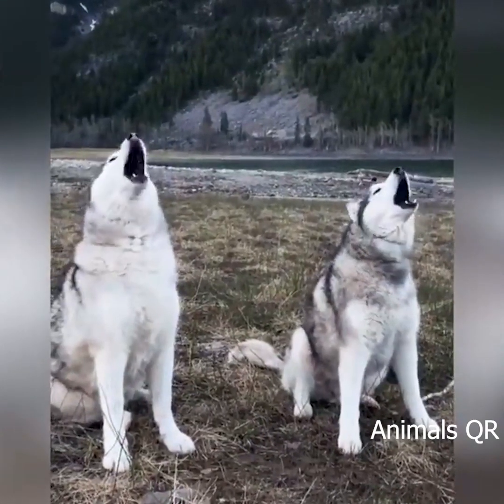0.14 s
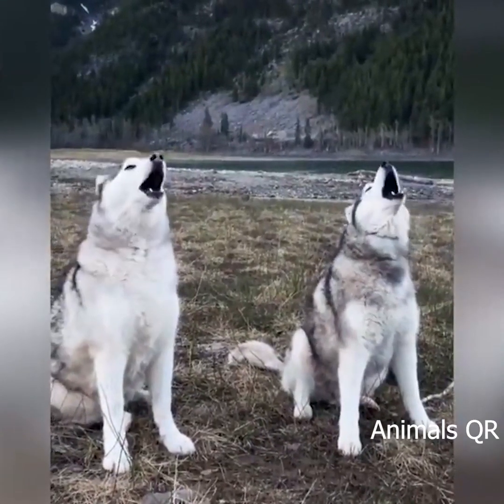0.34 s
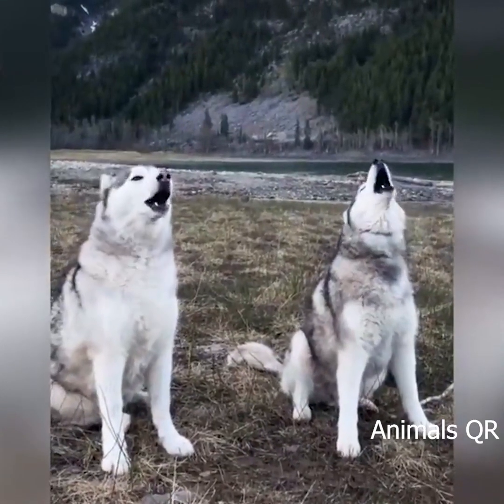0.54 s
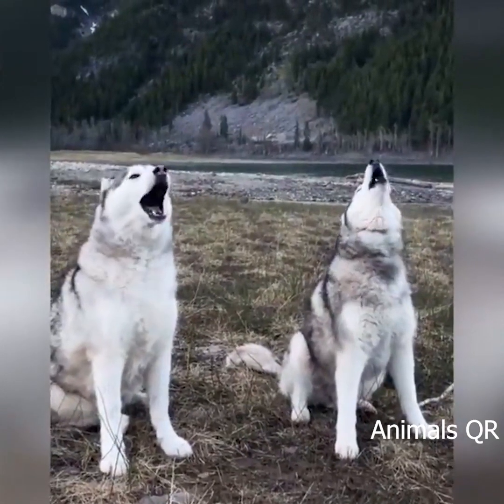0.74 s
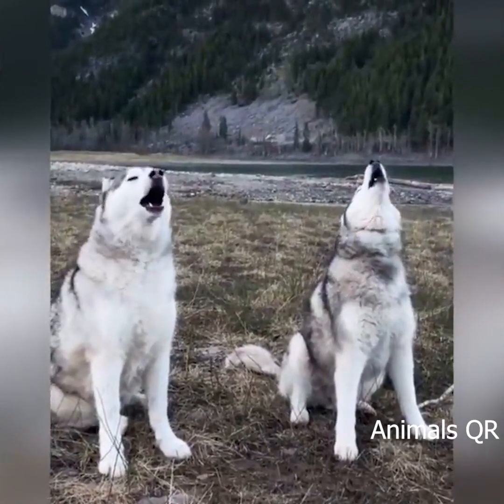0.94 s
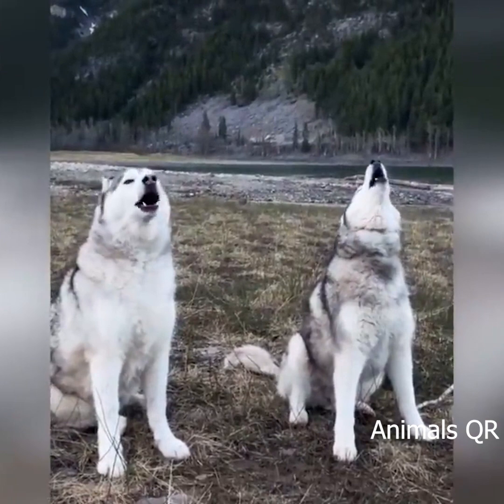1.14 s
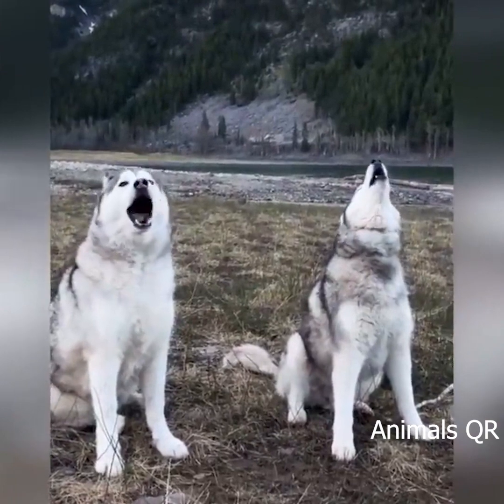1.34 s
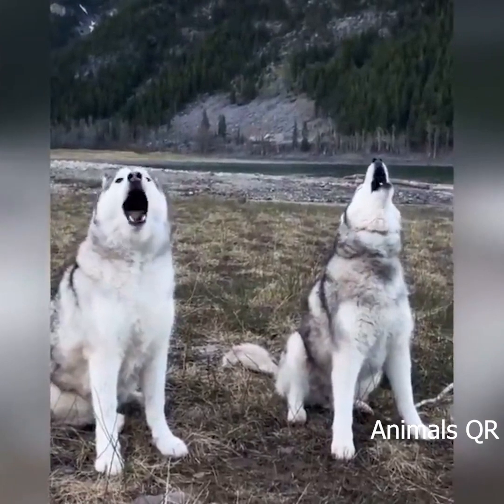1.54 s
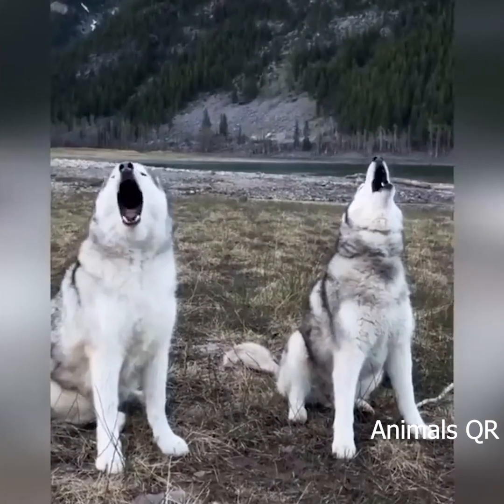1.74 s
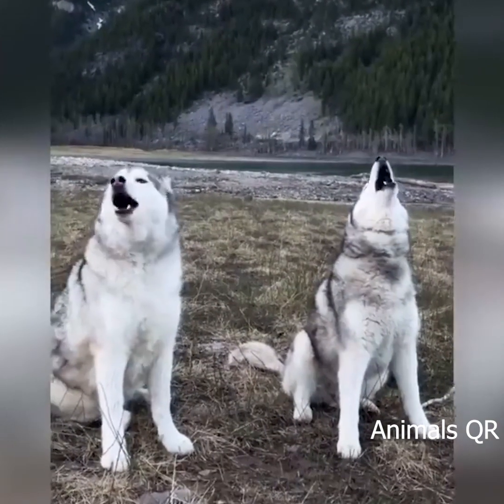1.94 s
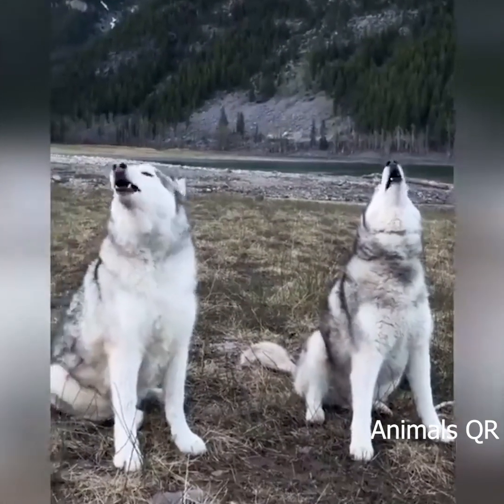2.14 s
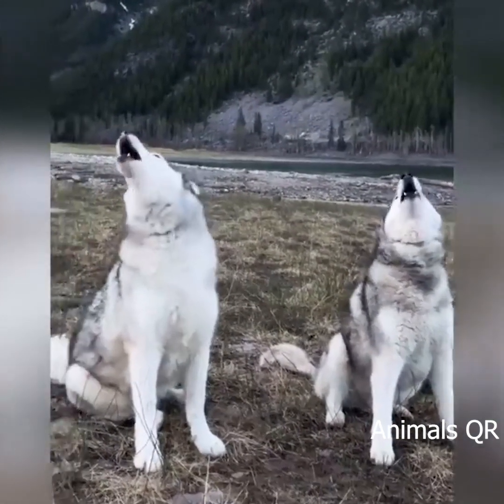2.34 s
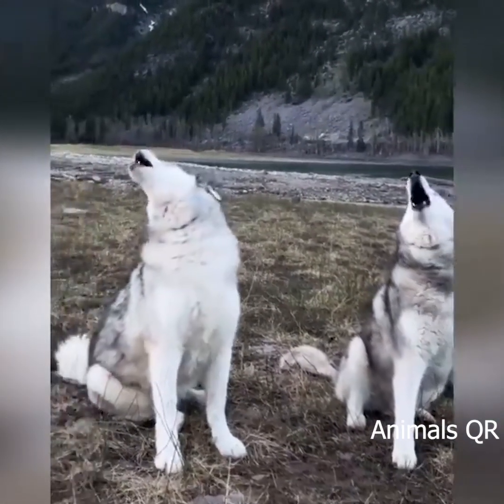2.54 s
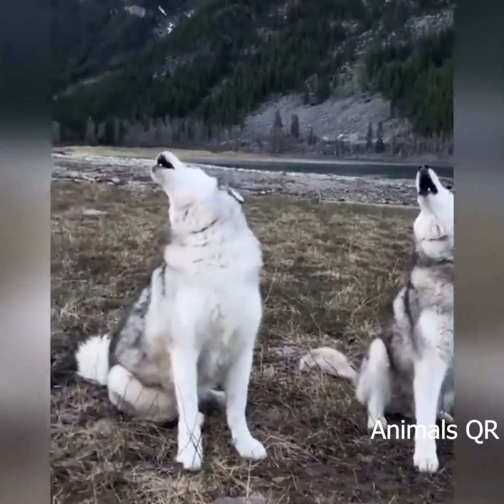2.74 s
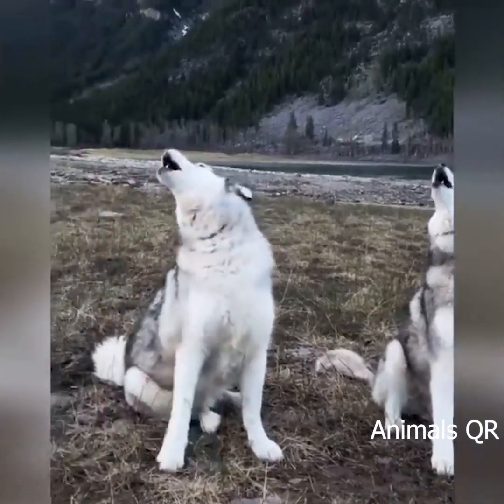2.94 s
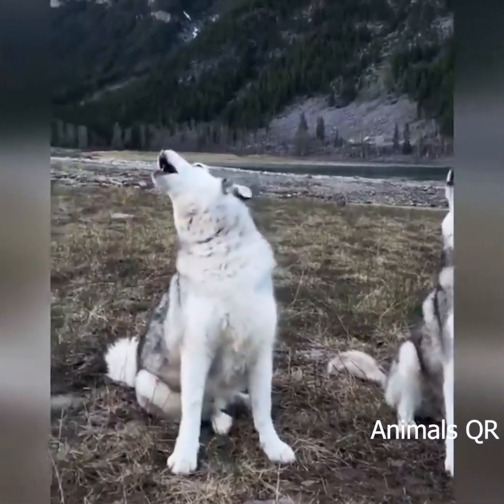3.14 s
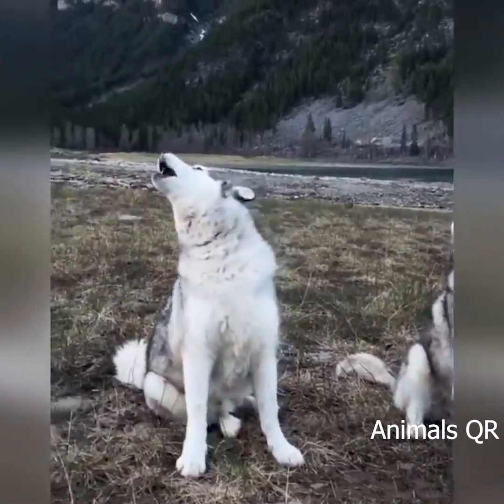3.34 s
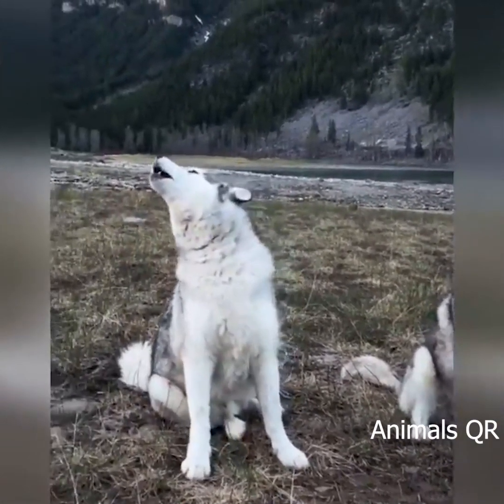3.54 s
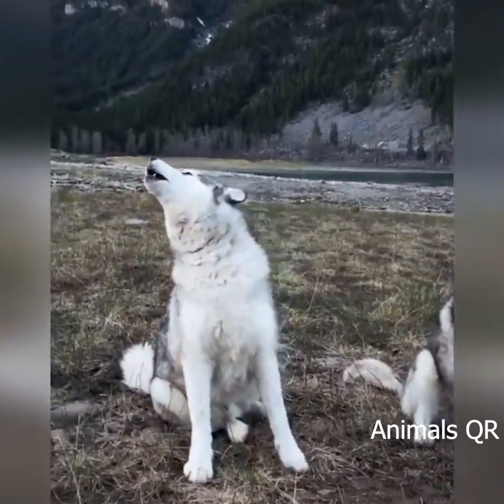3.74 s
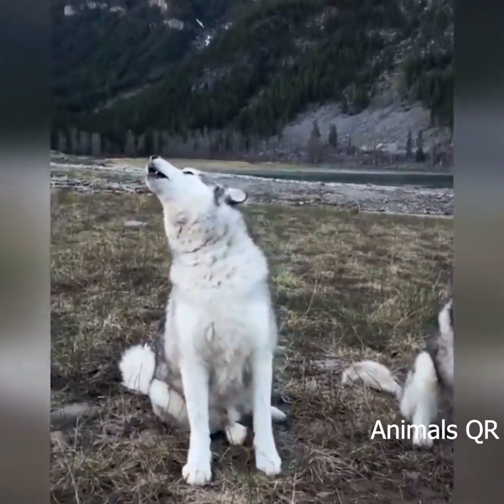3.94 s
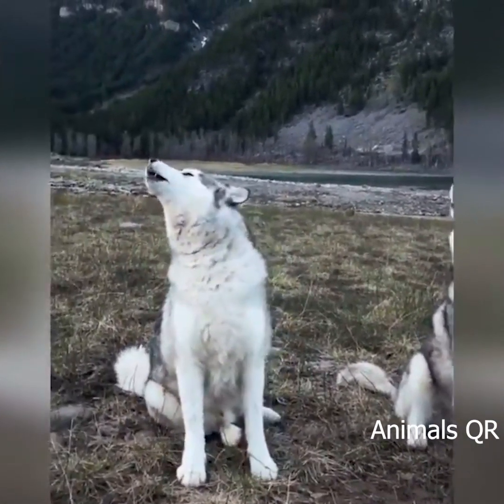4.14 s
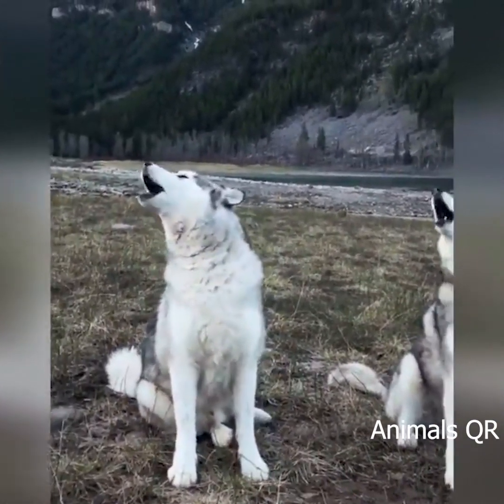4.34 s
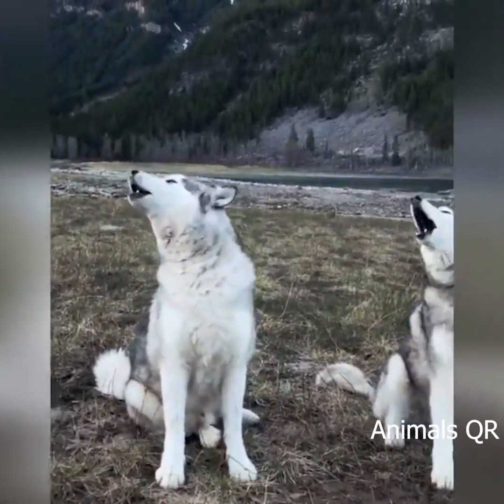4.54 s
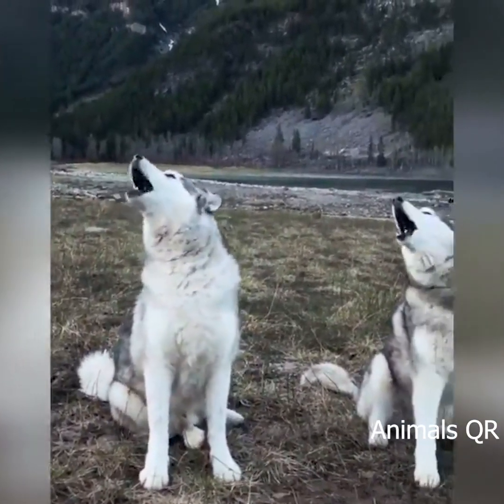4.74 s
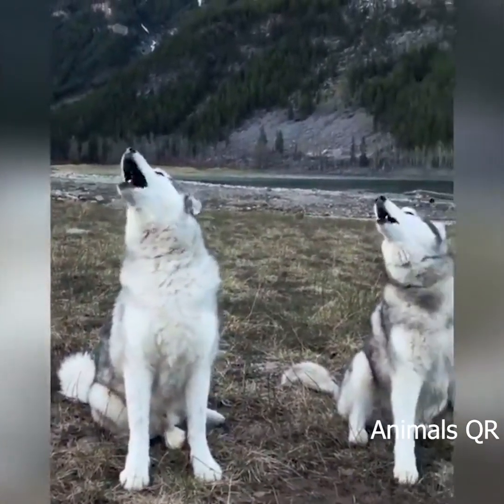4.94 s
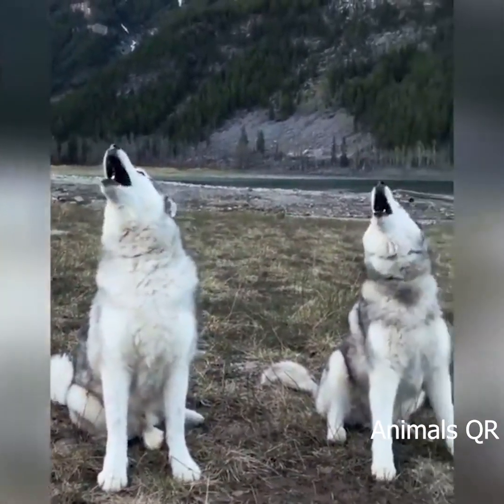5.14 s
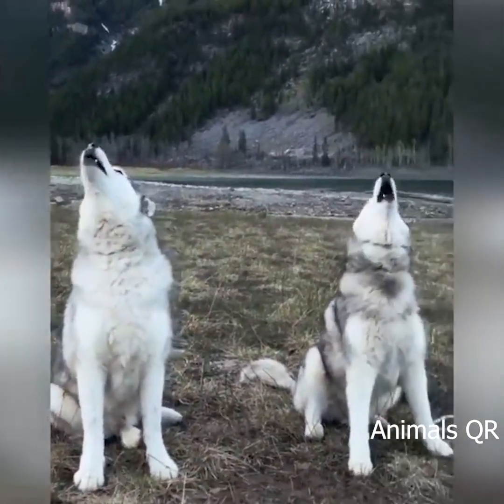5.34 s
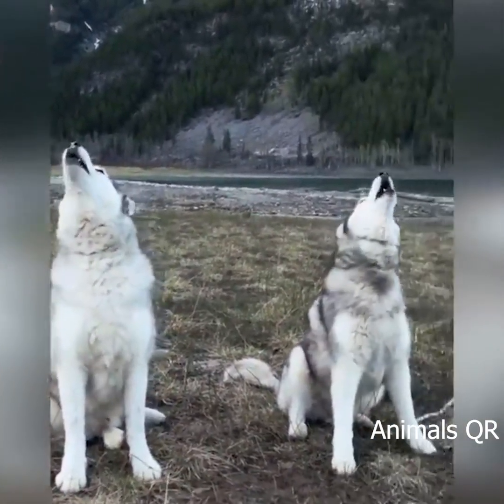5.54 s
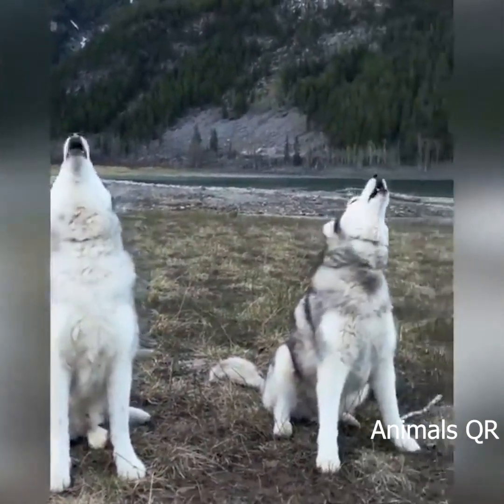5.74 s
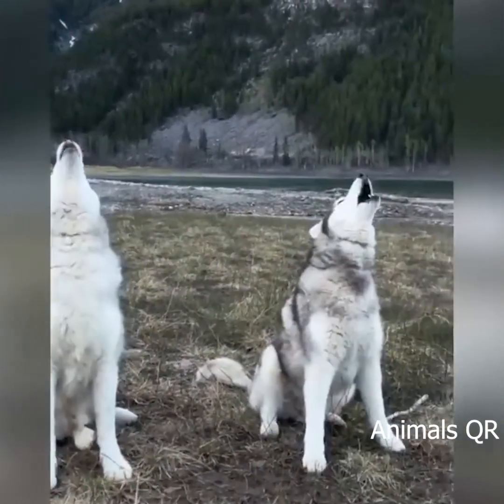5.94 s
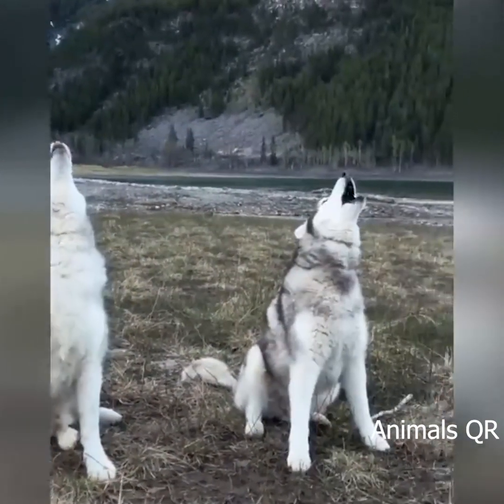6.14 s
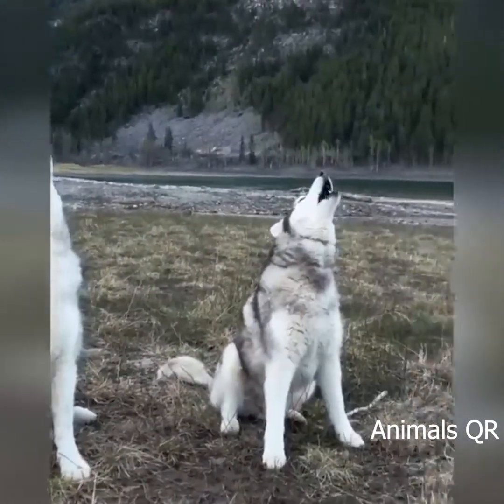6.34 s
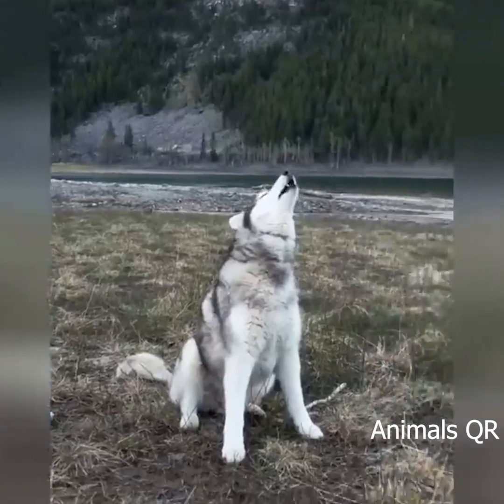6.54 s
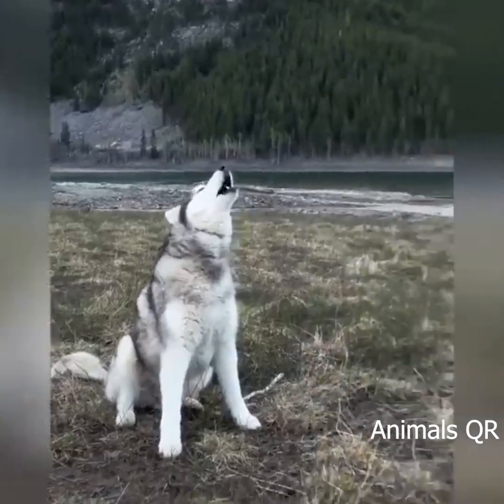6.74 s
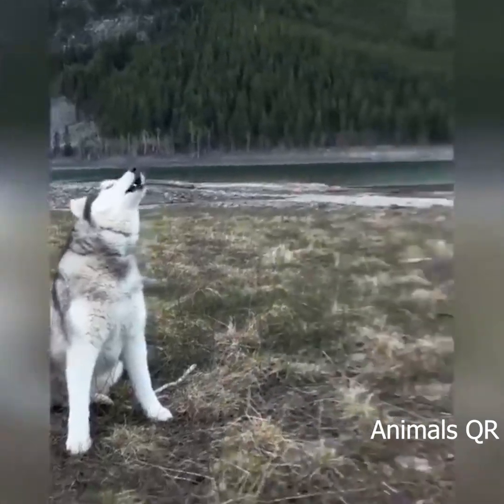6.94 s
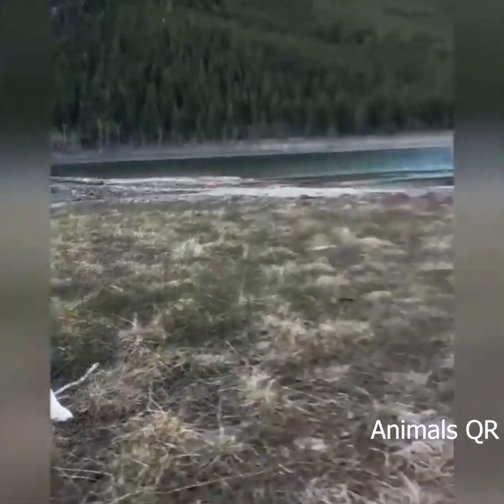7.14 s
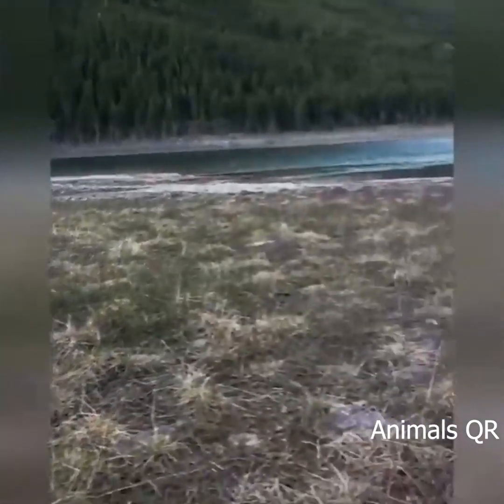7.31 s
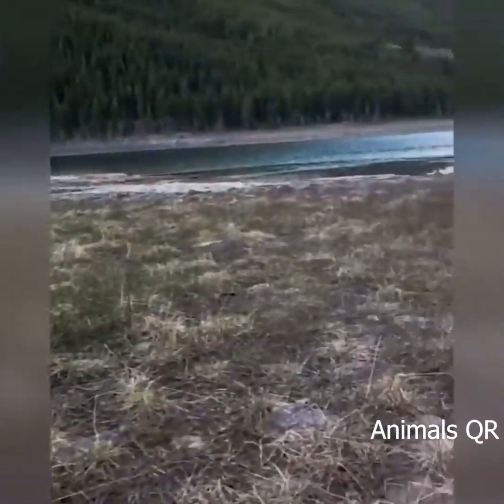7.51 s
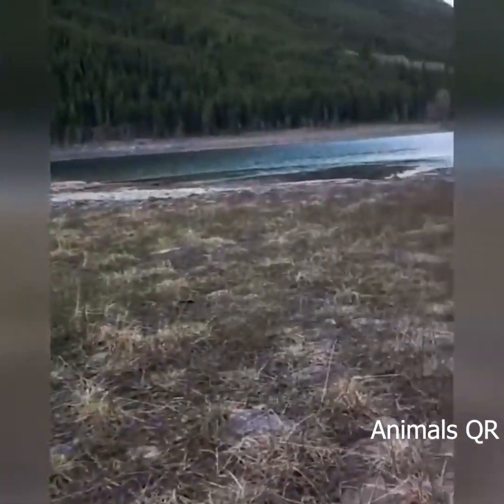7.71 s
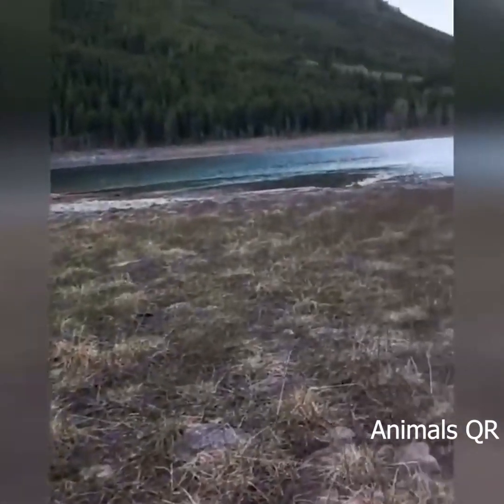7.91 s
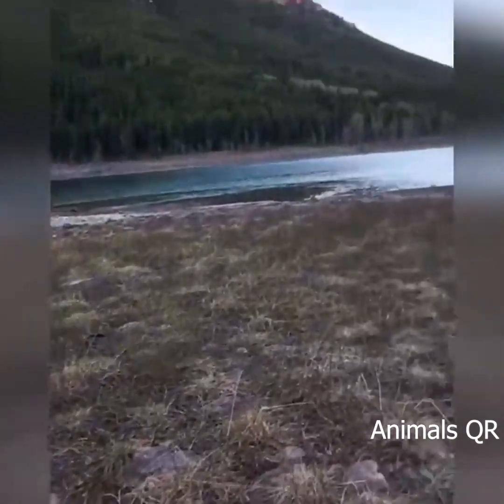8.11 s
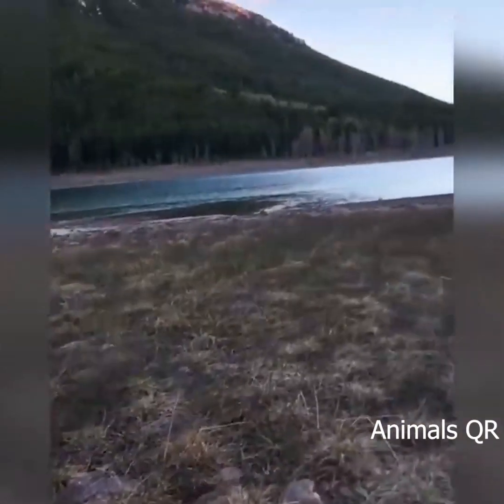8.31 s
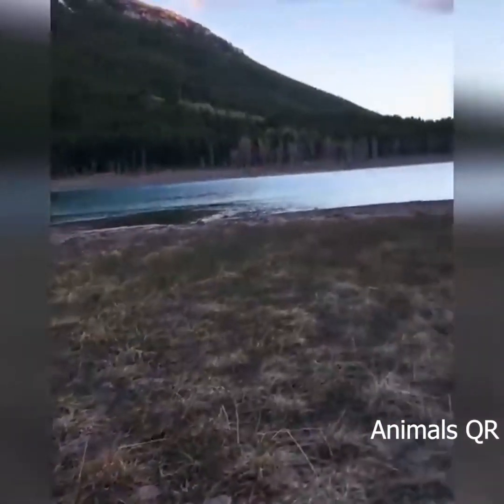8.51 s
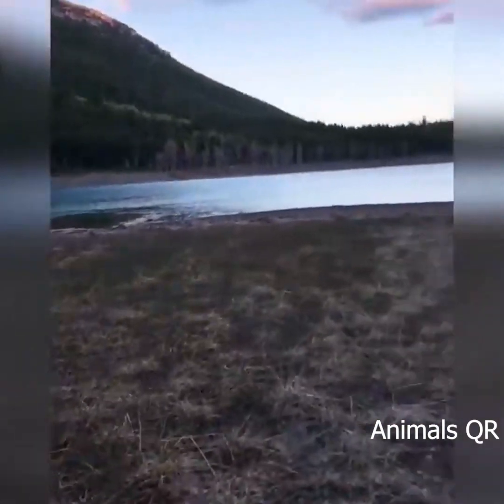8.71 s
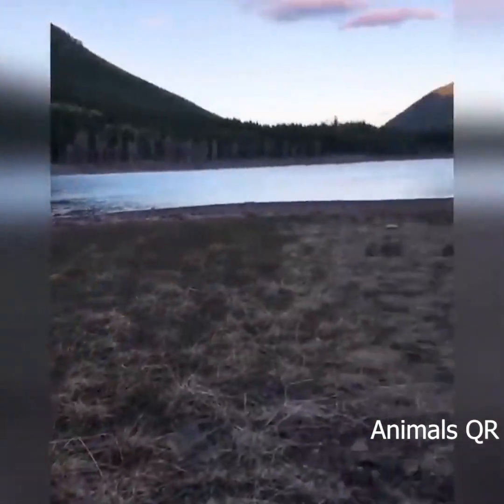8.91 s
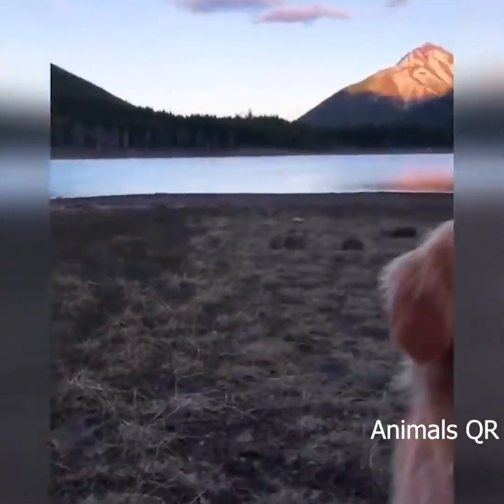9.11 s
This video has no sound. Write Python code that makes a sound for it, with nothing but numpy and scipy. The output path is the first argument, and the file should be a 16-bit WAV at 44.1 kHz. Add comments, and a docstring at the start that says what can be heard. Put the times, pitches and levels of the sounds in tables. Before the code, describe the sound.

Two large dogs howl close by in an open meadow with light wind buffeting the microphone. The higher dog begins hoarse and pulsing, then sings long, nearly pure falling glides; the lower one holds a reedy, wavering note beneath. After about seven seconds the howls fade into a grumble, broken cries, a small hoot and yelps, with one last hoarse yelp near the end.

```python
"""Two huskies howling on a meadow

An open lakeside meadow with light wind on the microphone, a phone a couple of metres from the dogs.
The high dog sings nearly pure glides from a few sines; in its breaks thirds of the pitch and rasping
noise make a hoarse yowl, and it ends in a yelp, a faint whine and a last yelp. The low dog holds a reedier
note of harmonics through a fixed throat colour. Wind and hush are coloured noise; the ground scatters a weak tail."""
import sys
import numpy as np
from scipy import signal
from scipy.fft import rfft, irfft, next_fast_len
from scipy.io import wavfile
from scipy.ndimage import uniform_filter1d, minimum_filter1d

SR = 44100
rng = np.random.default_rng(int(sys.argv[2]) if len(sys.argv) > 2 else 0)


def inscribe(sig):
    """Save sig as 16-bit PCM at rate SR to the path in sys.argv[1].

    A 1-D sig is mono; a 2-D sig holds one channel per row.
    Samples are clipped to [-1, 1] before scaling.
    """
    pcm = np.round(np.clip(np.atleast_2d(sig).T, -1, 1) * 32767)
    wavfile.write(sys.argv[1], SR, pcm.astype(np.int16))


N = 404397
TIME = np.arange(N) / SR  # s
CONTROL_STEP = 50  # samples between values of the slowly changing gains
CONTROL_TIME = TIME[::CONTROL_STEP]  # s
TOP_HZ = 15700  # upper edge of what the microphone hears


def undb(db):
    """Decibels to gain."""
    return 10 ** (np.asarray(db) / 20)


def curves(rows):
    """The columns of a table, joined by straight lines in time."""
    s, *columns = np.transpose(rows)
    return [np.interp(TIME, s, c) for c in columns]


def colour_db(points, hz):
    """A spectrum in dB, read on a log-frequency axis."""
    f, db = np.transpose(points)
    return np.interp(np.log(hz), np.log(f), db)


def noise(points):
    """Noise of the given colour, spread 1."""
    size = next_fast_len(N)
    hz = np.arange(size // 2 + 1) * SR / size + 1  # the 1 keeps the logarithm finite
    spectrum = rfft(rng.standard_normal(size)) * undb(colour_db(points, hz))
    x = irfft(spectrum, size)[:N]
    return x / x.std()


def flutter(hz):
    """Random wobble up to about hz, spread 1."""
    lowpass = signal.butter(2, hz, fs=SR, output="sos")
    x = signal.sosfilt(lowpass, rng.standard_normal(N))
    return x / x.std()


def drift(rate, count):
    """Smooth random control values changing about rate times a second, spread 1, a row per partial."""
    settle = 400  # control values dropped while the filter starts up
    lowpass = signal.butter(2, min(rate / 441, .9), output="sos")  # 441 Hz: half the control rate
    draws = rng.standard_normal((count, len(CONTROL_TIME) + settle))
    x = signal.sosfilt(lowpass, draws)[:, settle:]
    return x / x.std()


def gate(start, end, edge):
    """1 between two moments, with soft edges; all in seconds."""
    return np.clip(np.minimum(TIME - start, end - TIME) / edge + .5, 0, 1)


def blend(clear, broken, share):
    """Cross-fade at constant power; share is the broken part's power, 0-1."""
    return np.sqrt(1 - share) * clear + np.sqrt(share) * broken


def turn(hz):
    """Phase of an oscillator, in radians."""
    return 2 * np.pi * np.cumsum(hz) / SR


def song(calls):
    """A dog's calls joined: when it sounds, its smoothly gliding pitch, its effort."""
    sounding = sum(gate(call[0][0], call[-1][0], 0.024) for call in calls)
    rows = sorted(tuple(row) for call in calls for row in call)
    hz, effort_db = curves(rows)
    return np.minimum(sounding, 1), uniform_filter1d(hz, size=700), effort_db


def overtones(phase, hz, throat, orders, uneven_db, rate):
    """Harmonics slide through a fixed throat colour, each swelling and fading by itself; rms about 1."""
    out, power = 0, 0
    phase = (phase % (2 * np.pi)).astype(np.float32)
    control_hz = hz[::CONTROL_STEP]
    for k, swell in zip(orders, drift(rate, len(orders))):
        partial_hz = k * control_hz
        gain = undb(colour_db(throat, partial_hz) + uneven_db * swell) * (partial_hz < TOP_HZ)
        partial = np.sin(k * phase + k * k)  # k * k scatters the starting phases
        out = out + np.interp(TIME, CONTROL_TIME, gain) * partial
        power = power + gain ** 2 / 2
    rms = np.sqrt(uniform_filter1d(power, size=20))
    return out / np.interp(TIME, CONTROL_TIME, rms)


def rasp(phase, throat):
    """Turbulence puffed out once a cycle through the throat."""
    low_cut = [(300, -46), (800, -20.5)]  # (frequency [Hz], level [dB])
    return noise(low_cut + list(throat)) * (1 + 0.78 * np.cos(phase))


# wind buffeting the microphone, before the gusts: (time [s], level [dB])
WIND_LEVEL = [(0, -43.5), (1.1, -47.5), (1.6, -63), (2.6, -48.5), (3.2, -58.5), (4.8, -40), (5.6, -47),
              (6.9, -38.5), (7.1, -61)]
# spectra of the wind and of the faint air hush: (frequency [Hz], relative level [dB])
WIND_COLOUR = [(20, -18.5), (70, 5), (130, -3.5), (240, -16), (1200, -56)]
AIR_COLOUR = [(30, -16.5), (170, -2.5), (450, 0), (1500, -13), (5000, -25), (15000, -34.5)]
AIR_DB = -49.5  # average level of the hush


def outdoors():
    """Buffeting wind over the faint hush of the valley: two coloured noises with wandering levels."""
    gusts_db = 3.5 * flutter(9)
    wind = noise(WIND_COLOUR) * undb(curves(WIND_LEVEL)[0] + gusts_db)
    hush = noise(AIR_COLOUR) * undb(AIR_DB + flutter(2.5))
    return wind + hush


def meadow(x):
    """Open ground: only a weak, dull scatter comes back, decaying 60 dB in a quarter of a second."""
    t = TIME[:SR]
    tail = rng.standard_normal(SR) * undb(-60 * t / 0.25) * (t > .006)
    tail = signal.sosfilt(signal.butter(1, 3000, fs=SR, output="sos"), tail)
    tail = tail / np.linalg.norm(tail)
    return x + undb(-19.0) * signal.fftconvolve(x, tail)[:N]


# a faint low tone under the end of the last howl: (time [s], level [dB])
WAVER_LEVEL = [(6.761, -40.5), (7.1, -40.5), (7.421, -34), (7.501, -32)]


def wavering_tone(centre_hz=320, swing_hz=62):
    """A soft low sine whose pitch swings up and down six times a second."""
    hz = centre_hz + swing_hz * np.cos(2 * np.pi * 6 * TIME)
    sounding = gate(WAVER_LEVEL[0][0], WAVER_LEVEL[-1][0], .03)
    return sounding * undb(curves(WAVER_LEVEL)[0]) * np.sin(turn(hz))


# how bright the dogs' treble is, brightest in the closing calls: (time [s], treble lift [dB])
TREBLE_LIFT = [(0, -3), (.6, 0), (1.3, 4), (2.9, 4), (3.7, 12.5), (4.6, -4.5), (5, -2.5), (5.4, 6.5),
               (6.3, 1.5), (7.1, -2.5), (7.3, 3.5), (7.55, 8.5), (7.76, 8), (7.95, 19), (8.5, 5),
               (9.1, 10.5)]


def treble_lift_db():
    """The slow brightening and dulling shared by the dogs' treble and the low dog's hiss."""
    return curves(TREBLE_LIFT)[0]


def lifted_treble(dogs):
    """A treble band of the voices with a slowly changing lift and a slight random flutter."""
    band = signal.butter(2, [3100, 7000], "band", fs=SR, output="sos")
    treble = signal.sosfiltfilt(band, dogs)
    lift_db = treble_lift_db() + 2 * flutter(14)
    return dogs + (undb(lift_db) - 1) * treble


# mouth resonances that swell a low harmonic gliding through them: (frequency [Hz], level [dB])
LOW_MOUTH = [(590, -3), (720, -1), (800, -5), (950, -12), (1030, -3), (1130, -2.5), (1200, -7),
             (1300, -6.5), (1420, -13), (2000, -14)]
# how far the low dog's jaw opens: (time [s], lift of the overtones [dB])
LOW_JAW = [(0, 6), (1.3, 8.5), (1.8, 7.5), (2, 1), (2.7, 1), (3.4, -9.5), (3.9, -17.5), (4.15, 1),
           (4.7, 11), (5.3, -1), (5.6, -5.5), (6.35, 0.5), (6.6, 0), (7.3, 10.5), (7.72, 13.5), (7.8, 12.5),
           (7.84, 1), (7.95, -17)]
LOW_OVERTONES_DB = -20.5  # overtones against effort, before the jaw's lift


def low_levels(hz, effort_db, wander_db=3.5):
    """Levels in dB of harmonics 2 to 4, each wandering in the mouth's resonances, and of the overtones."""
    harmonic_db = []
    for k in range(2, 5):
        harmonic_db.append(effort_db + colour_db(LOW_MOUTH, k * hz) + wander_db * flutter(6))
    return harmonic_db, effort_db + LOW_OVERTONES_DB + curves(LOW_JAW)[0]


# the low dog's calls: (time [s], pitch [Hz], effort [dB])
LOW_OPENING = [(0, 338.7, -17), (.2, 360, -18.5), (.57, 339.6, -20), (1.14, 319, -25), (1.41, 326.5, -23.5),
               (1.71, 368, -17.5), (1.95, 376, -19), (2.07, 389.3, -25), (2.11, 486, -43.5)]
LOW_LONG_HOWL = [(2.569, 307.3, -20), (2.719, 341.1, -19.5), (3.22, 341.6, -22), (3.42, 323.6, -25.5),
                 (3.57, 307.6, -27.5), (3.98, 297.8, -29), (4.04, 326.2, -17.5), (4.2, 341.6, -22),
                 (4.5, 363.3, -16.5), (4.86, 379.2, -18), (5, 361.9, -27), (5.26, 339.4, -18.5),
                 (5.6, 319, -21), (5.811, 294, -20.5), (5.88, 316.7, -24), (6.1, 343.9, -17.5),
                 (6.36, 355.5, -17), (6.6, 298.3, -27.5), (6.88, 317, -31), (7.099, 311.5, -51)]
LOW_GRUMBLE = [(7.2, 295.3, -35), (7.3, 318.2, -21), (7.37, 354, -26.5), (7.409, 298.6, -29),
               (7.469, 282, -19.5)]
LOW_RISING_CALL = [(7.69, 331, -28.5), (7.735, 380, -17.5), (7.775, 401, -13.5), (7.799, 392, -17.5),
                   (7.841, 447.6, -19), (7.892, 487.4, -20.5)]
LOW_WHIMPER = [(8.058, 501, -30), (8.089, 461.6, -30), (8.131, 537, -32)]
# throat and mouth colour of its overtones: (frequency [Hz], relative level [dB])
LOW_THROAT = [(1400, 0), (2200, -8), (2800, -3), (3700, -36), (4400, -30), (5700, -23), (7100, -25.5),
              (11500, -42.5), (15000, -48.5)]
# where it turns hoarse: (start [s], end [s], roughness [0-1])
LOW_HOARSE = [(7.221, 7.459, 0.28), (7.687, 7.841, 0.08)]


def low_dog():
    """A steady reedy note whose weak fundamental lies below the mouth's resonances, with a little hiss."""
    calls = [LOW_OPENING, LOW_LONG_HOWL, LOW_GRUMBLE, LOW_RISING_CALL, LOW_WHIMPER]
    sounding, hz, effort_db = song(calls)
    harmonic_db, upper_db = low_levels(hz, effort_db)
    phase = turn(hz * (1 + 0.003 * flutter(40) + 0.0017 * flutter(220)))
    body = sum(undb(db) * np.sin(k * phase) for k, db in enumerate(harmonic_db, 2))
    fundamental = undb(harmonic_db[0] - 27.5) * np.sin(phase)
    # slightly uneven cycles blur the highest harmonics most
    uneven_phase = phase + .014 * flutter(110)
    upper = overtones(uneven_phase, hz, LOW_THROAT, range(5, 42), uneven_db=5, rate=3)
    hoarse = np.clip(sum(r * gate(a, b, .03) for a, b, r in LOW_HOARSE), 0, 1)
    upper = blend(upper, rasp(phase, LOW_THROAT), hoarse)
    hiss = noise([(2500, -30), (4600, 0), (6000, -2), (14000, -24)])
    upper = upper + hiss * undb(-36 + treble_lift_db())
    voice = np.sqrt(2) * (body + fundamental) + undb(upper_db) * upper
    return sounding * voice * undb(.5 * flutter(55))


# sudden pushes of the high dog's chest:
# (time [s], extra effort [dB], pitch lift [Hz], fundamental regained [dB])
PUSHES = [(-.02, 23, -10.5, -4.5), (0.199, 5.5, 5, 8), (.44, 2.5, 8, 8), (.77, 8.5, 65, 0.5),
          (1.03, 2, 0, 2), (1.275, 18, 90, 3), (1.519, 1.5, 0, 9.5), (1.76, 9.5, 20, -2.5),
          (4.3, 6, 8, 4.5), (4.62, 1, 0, 7), (4.853, 8.5, 24.5, 2), (5.051, 9, 0, 16), (5.159, 3, 0, 15.5)]
PUSH_RISE_S, PUSH_FALL_S = .035, .055


def pushes():
    """Each push swells fast and eases off more slowly; returns extra effort, pitch lift, regained level."""
    total = 0
    for s, *sizes in PUSHES:
        width = np.where(TIME < s, PUSH_RISE_S, PUSH_FALL_S)
        total = total + np.outer(sizes, np.exp(-((TIME - s) / width) ** 2))
    return total


# where the high dog's voice breaks:
# (start [s], end [s], roughness [0-1, any excess is clipped], loss of the fundamental [dB])
BREAKS = [(0.01, 0.491, 1.04, 14.5), (0.456, .646, 0.96, 12), (0.726, 1.149, 1.09, 10.5),
          (1.233, 1.906, 0.99, 14.5), (2.213, 2.369, 0.83, 5), (2.462, 2.6, .59, -2.5),
          (4.268, 4.422, 0.79, 4), (4.58, 4.993, 1, 10.5), (4.98, 5.24, 0.85, 17.5),
          (5.617, 5.759, 0.85, 3.5), (6.391, 6.541, 0.33, 17), (7.468, 7.64, 1.01, 8.5),
          (8.139, 8.37, 1, 6.5), (8.947, 9.061, 1, 6)]
DRAIN_S = 0.053  # how long a break takes to drain the fundamental


def breaks():
    """Roughness of the voice from 0 to 1, and the dB its fundamental loses in each break."""
    rough, loss_db = 0, 0
    for start, end, r, db in BREAKS:
        rough = rough + r * gate(start, end, .025)
        loss_db = loss_db + db * gate(start, end, 0.069) * np.clip((TIME - start) / DRAIN_S, 0, 1)
    return np.clip(rough, 0, 1), loss_db


# mouth resonance around the high dog's fundamental: (frequency [Hz], level [dB])
HIGH_MOUTH = [(400, -15), (440, -6.5), (490, -5), (540, -2), (590, 0.5), (650, -2), (750, 0), (1000, 5.5)]
# how far the high dog's jaw opens: (time [s], lift of the clear overtones [dB])
HIGH_JAW = [(1.2, -0.5), (2.4, 3.5), (2.62, 3), (2.72, -2.5), (3.4, -4.5), (3.65, 1), (4.4, 6), (5.3, 4),
            (5.88, 2), (6.12, 10.5), (6.27, 2), (6.43, 11.5), (6.52, 9.5), (6.57, 3.5), (6.92, 16),
            (7.02, 17.5), (7.15, 17), (7.25, 2), (7.95, 13), (8.42, 18.5), (8.65, 19)]
# octave and overtones against effort, in the clear voice (before the jaw's lift) and the broken one
CLEAR_OCTAVE_DB, CLEAR_OVERTONES_DB = -17.5, -32
BROKEN_OCTAVE_DB, BROKEN_OVERTONES_DB = -7.5, -15.5
OCTAVE_SHARE = 0.83  # how much of the jaw's lift reaches the octave


def high_levels(hz, effort_db, regained_db, rough, loss_db):
    """Gains of fundamental, octave, overtones: an open jaw brightens, a break throws power upward."""
    jaw_db = curves(HIGH_JAW)[0]
    first_db = colour_db(HIGH_MOUTH, hz) - loss_db + regained_db
    octave_db = (1 - rough) * (CLEAR_OCTAVE_DB + OCTAVE_SHARE * jaw_db) + rough * BROKEN_OCTAVE_DB
    upper_db = (1 - rough) * (CLEAR_OVERTONES_DB + jaw_db) + rough * BROKEN_OVERTONES_DB
    return undb(effort_db + np.array([first_db, octave_db, upper_db]))


# throat colour of the high dog's overtones, clear and hoarse: (frequency [Hz], relative level [dB])
HIGH_THROAT = [(1350, 9), (1800, 1.5), (2450, 5), (3000, -14), (3550, -11.5), (4400, -51.5), (5800, -29),
               (9000, -41.5), (15000, -57)]
HOARSE_THROAT = [(1400, -8), (1750, 7.5), (2050, -6.5), (2500, 2), (3000, -17.5), (3500, -21.5),
                 (4400, -42.5), (6000, -24.5), (8500, -25), (10200, -37.5), (12000, -35.5), (15000, -52.5)]


def clear_voice(hz):
    """Smoothly repeating vocal folds: fundamental, octave and overtones with a trace of rasp."""
    phase = turn(hz * (1 + 0.00203 * flutter(37.9)))
    ring = overtones(phase, hz, HIGH_THROAT, range(3, 28), uneven_db=4, rate=4)
    ring = ring + undb(-42.5) * rasp(phase, HOARSE_THROAT)
    return np.sqrt(2) * np.sin(phase), np.sqrt(2) * np.sin(2 * phase + 1), ring


def torn(phase, weights_db, chaos):
    """Partials on thirds of the pitch, {multiple of the third: dB}, part steady, part chaotic; rms about 1."""
    out, power = 0, 0
    for k, db in weights_db.items():
        a, b = (np.interp(TIME, CONTROL_TIME, row) for row in drift(42, 2))
        angle = k * phase / 3 + turn(10 * a)  # each partial strays by about 10 Hz
        out = out + undb(db) * ((1 + chaos * a) * np.sin(angle) + chaos * b * np.cos(angle))
        power += undb(db) ** 2 * (.5 + chaos ** 2)
    return out / np.sqrt(power)


def broken_voice(hz):
    """Vocal folds repeating only every third cycle: a staggering pitch with sidebands, mostly above."""
    stagger = turn(hz * (1 + .027 * flutter(22) + .022 * flutter(200)))
    low = torn(stagger, {3: 0, 4: -6}, chaos=.55)
    middle = torn(stagger, {5: -13, 6: 0, 7: -1.5, 8: -15}, chaos=.55)
    orders = [k for k in range(9, 20) if k % 3 < 2]  # each harmonic and the sideband just above it
    snarl = overtones(stagger / 3, hz / 3, HOARSE_THROAT, orders, uneven_db=5, rate=35)
    snarl = .88 * snarl + .47 * rasp(stagger / 3, HOARSE_THROAT)
    return low, middle, snarl


# the high dog's calls: (time [s], pitch before the pushes [Hz], effort before the pushes [dB])
HIGH_OPENING = [(0, 559.5, -12.5), (.4, 560.3, -9), (.62, 535.8, -12.5), (.7, 529, -8.5),
                (.86, 595.2, -14.5), (1.04, 560, -12.5), (1.13, 535.7, -16.5), (1.21, 503.5, -11),
                (1.41, 571, -15), (1.52, 546.4, -9.5), (1.87, 580, -10.5), (1.91, 579, -47)]
HIGH_LONG_HOWL = [(2.222, 439.8, -20), (2.251, 529, -4), (2.355, 545, -6), (2.379, 630, -6.5),
                  (2.45, 589.4, -5.5), (2.519, 593.4, -9), (2.609, 643, -9.5), (2.7, 600.7, -6.5),
                  (3.07, 577.6, -10.5), (3.22, 592, -8.5), (3.419, 536, -10), (3.622, 448.4, -14.5),
                  (3.85, 441.6, -14), (3.98, 414, -15.5), (4.231, 399.7, -16.5)]
HIGH_YOWL = [(4.249, 440, -15), (4.37, 586, -8), (4.44, 527, -29), (4.51, 549, -30), (4.571, 468.4, -18),
             (4.63, 570, -4.5), (4.72, 565.8, -9.5), (4.959, 570.6, -12), (5.23, 603.2, -8.5),
             (5.27, 655, -18.5)]
HIGH_LAST_HOWL = [(5.648, 490, -12.5), (5.674, 520.7, -4.5), (5.79, 629, -6.5), (5.88, 552.2, -6.5),
                  (6.121, 501.2, -11.5), (6.27, 537.8, -7), (6.391, 670, -3), (6.421, 594.6, -7),
                  (6.54, 552.6, -4.5), (6.56, 613.5, -7.5), (6.7, 517.3, -9.5), (6.821, 484, -12.5),
                  (6.919, 475, -13), (6.991, 533.6, -13.5), (7.04, 537.4, -15), (7.1, 513.7, -17.5),
                  (7.22, 439, -21), (7.441, 430.7, -19.5)]
HIGH_CRY = [(7.45, 434, -15), (7.531, 603.6, -0.5), (7.641, 638, -15.5), (7.72, 689, -23.5)]
HIGH_HOOT = [(7.885, 652, -38), (7.899, 673, -16), (7.929, 647, -17.5), (7.981, 670.4, -26),
             (8.049, 671, -36), (8.079, 596.5, -36)]
HIGH_YELP = [(8.15, 548, -28), (8.18, 629.3, -9), (8.235, 687.5, -5), (8.366, 720, -28.5)]
# a faint high whine, then a loud hoarse yelp; same columns
HIGH_WHINE_AND_LAST_YELP = [(8.384, 1250, -42), (8.429, 1252, -51), (8.52, 1230, -56), (8.6, 1135, -60.5),
                            (8.75, 969, -43), (8.85, 945, -41), (8.9, 718, -35.5), (8.94, 701, -14.5),
                            (8.98, 749, -10.5), (9.06, 691, -18), (9.09, 745, -19.5), (9.17, 759, -29.5)]


def high_dog():
    """A nearly pure howl that cross-fades into a hoarse, unsteady voice wherever it breaks."""
    calls = [HIGH_OPENING, HIGH_LONG_HOWL, HIGH_YOWL, HIGH_LAST_HOWL,
             HIGH_CRY, HIGH_HOOT, HIGH_YELP, HIGH_WHINE_AND_LAST_YELP]
    sounding, hz, effort_db = song(calls)
    extra_db, lift_hz, regained_db = pushes()
    hz = hz + lift_hz
    rough, loss_db = breaks()
    first, octave, upper = high_levels(hz, effort_db + extra_db, regained_db, rough, loss_db)
    clear_first, clear_octave, ring = clear_voice(hz)
    low, middle, snarl = broken_voice(hz)
    # the overtones break first, the fundamental holds longest
    voice = first * blend(clear_first, low, rough ** 4)
    voice = voice + octave * blend(clear_octave, middle, rough)
    voice = voice + upper * blend(ring, snarl, 1 - (1 - rough) ** 2)
    return sounding * voice


def scene():
    """Both dogs on the meadow, with the wavering tone, the wind and the hush; one channel."""
    dogs = lifted_treble(high_dog() + low_dog())
    return (meadow(dogs + wavering_tone()) + outdoors())[None]


def record(dry):
    """The phone turns down the loudest peaks and cuts the top."""
    allowed = 1 / np.maximum(np.abs(dry) / .95, 1)
    gain = uniform_filter1d(minimum_filter1d(allowed, size=300), size=300)
    top_cut = signal.ellip(8, .2, 70, TOP_HZ, fs=SR, output="sos")
    return signal.sosfilt(top_cut, dry * gain)


dry = scene()
out = record(dry)
inscribe(out)
```